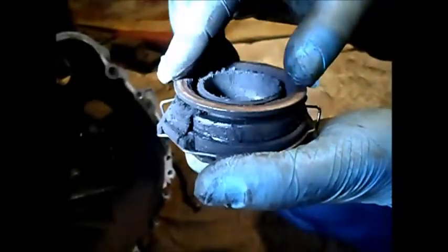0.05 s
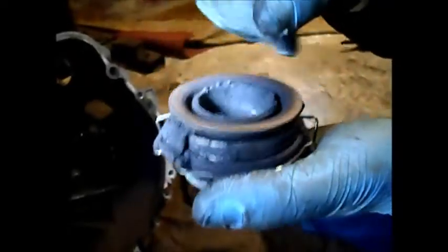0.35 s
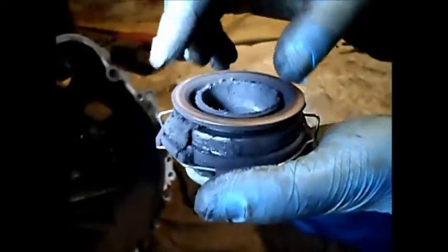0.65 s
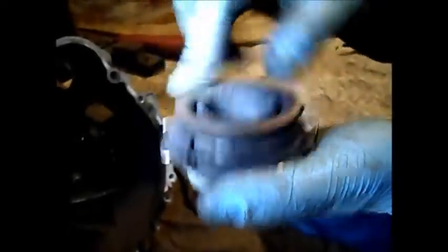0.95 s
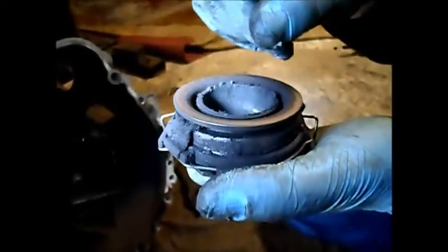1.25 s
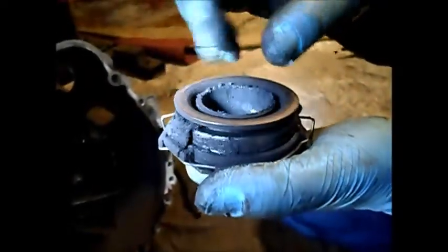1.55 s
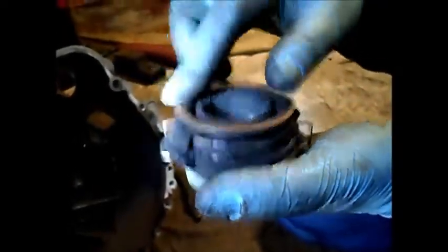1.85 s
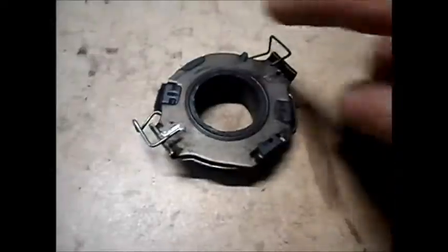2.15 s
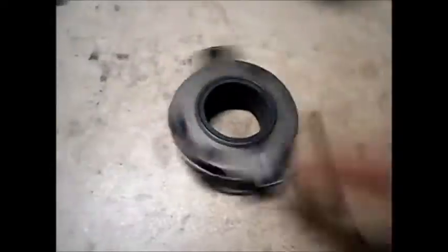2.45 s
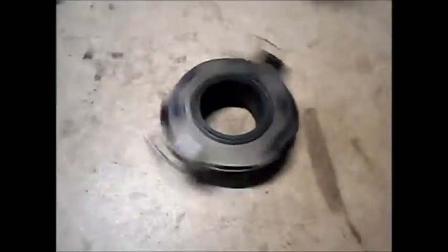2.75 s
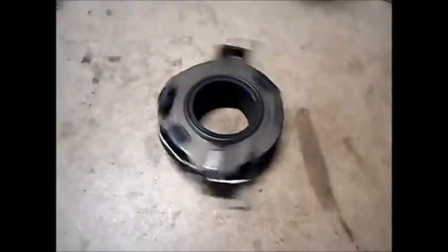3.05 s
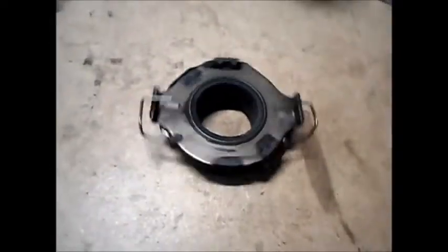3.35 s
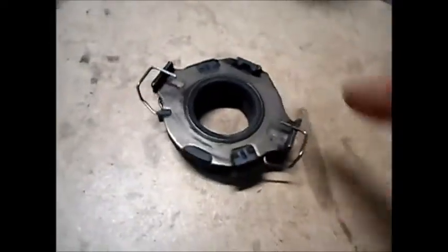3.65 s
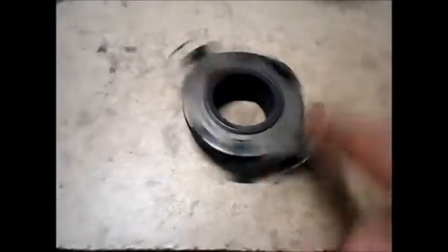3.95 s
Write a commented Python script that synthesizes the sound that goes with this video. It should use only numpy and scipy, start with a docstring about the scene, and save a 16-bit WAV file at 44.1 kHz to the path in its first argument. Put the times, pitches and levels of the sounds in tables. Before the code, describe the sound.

Worn bearing clatters in three metallic bursts before a second whirs down on a workbench.

```python
"""Workshop, close up. A dry, worn ball bearing is flicked round three times in a gloved hand:
its loose balls clatter in the steel races and make them ring. A second bearing is then spun on
the workbench: it rumbles through the top, slows and ends in single ticks.
Soft handling noise and low room rumble lie underneath."""
import sys
import numpy as np
from scipy import signal
from scipy.io import wavfile

SR = 44100
rng = np.random.default_rng(int(sys.argv[2]) if len(sys.argv) > 2 else 0)


def materialize(psi):
    """Save the field psi as 16-bit PCM at rate SR to the path in sys.argv[1].

    A 1-D psi becomes a single channel; in a 2-D psi each row is a channel.
    """
    bounded = np.clip(np.atleast_2d(psi).T, -1, 1)
    quanta = np.round(bounded * 32767).astype(np.int16)
    wavfile.write(sys.argv[1], SR, quanta)


N = 176400
TIME = np.arange(N) / SR

# Flicks: touch_s, full_speed_s, brake_s, stop_s, level_db, sag_db_per_s, brake_db
SPINS = [(-.1, -0.034, 0.18, 0.24, -24.5, 16.5, 12.5), (0.382, 0.426, 0.989, 1.066, -19, 18, 10.5),
         (1.181, 1.228, 1.915, 1.934, -19.5, 16.5, 1)]
# Hard knocks of loose balls: start_s, level_db
BALL_KNOCKS = [(.058, -5), (.111, -28), (.203, -13.5), (.389, -12.5), (.4145, -8), (.431, -15),
               (.439, -4.5), (.453, -4), (.479, -10.5), (.591, -24), (.637, -5), (.663, -20), (.681, -17),
               (.736, -6), (.753, -5), (.794, -6), (.822, -4), (.872, -8), (.894, -9), (.925, -13),
               (.979, -4), (1.022, -13.5), (1.06, -16.5), (1.2225, -8), (1.24, -12), (1.286, -7),
               (1.312, -28.5), (1.445, -22.5), (1.467, -37), (1.513, -4), (1.567, -5), (1.648, -9),
               (1.685, -4), (1.705, -10), (1.723, -6), (1.747, -10), (1.834, -11), (1.868, -30), (1.9, -11),
               (1.916, -13)]
# Finger scuffs on the rim: start_s, length_s, level_db
RIM_SCUFFS = [(.412, 0.03, -20.5), (1.221, 0.033, -22)]
# Spectrum of balls, cage and housing: freq_hz, gain_db
CLATTER_EQ = [(100, -30), (450, -26), (720, -21.5), (1050, -25), (1400, -15), (1650, -8), (2150, 0),
              (2400, -1), (2650, -7), (3200, -1), (3900, 1), (4900, 4), (5600, 1), (6400, -3), (7200, 3),
              (8200, -2.5), (8800, -9.5), (9600, -5.5), (10300, 0.5), (11000, -12.5)]
# Steel race modes: pitch_hz, width_hz, gain_db, grip_damping_db
RACE_MODES = [(4662, 150, -7.5, 3.5), (4873, 360, -6, 1.5), (7240, 720, -19.5, 1.5), (9380, 800, -7.5, 8),
              (9654, 560, .5, 8.5)]


def held_bearing():
    """Each flick drives ball impacts that clatter and ring the races until the fingers brake them."""
    release_s, grip_s = 0.011, 0.036
    effort, gripped = np.zeros(N), np.ones(N)
    for touch, full, brake, stop, level_db, sag_db_per_s, brake_db in SPINS:
        db = level_db + np.interp(TIME, [touch, full], [-16.5, 0])
        db -= sag_db_per_s * np.maximum(TIME - full, 0)
        db -= np.interp(TIME, [brake, stop], [0, brake_db])
        effort += amp(db) * (TIME >= touch) * (TIME < stop)
        gripped -= np.interp(TIME, [full - release_s, full, brake - grip_s, brake], [0, 1, 1, 0])
    balls = impacts(1300, spread_db=1.5, decay_s=0.00063, rise_s=0.0012)
    knocks = blows(BALL_KNOCKS, decay_s=0.0015)
    scuffs = swells(RIM_SCUFFS) * impacts(2300, spread_db=3, decay_s=0.00089)
    out = colour(amp(-3.5) * effort * balls + amp(1.5) * knocks + scuffs, CLATTER_EQ)
    ring_gain = amp(-1) * effort * (effort / effort.max()) ** 0.19  # harder spins ring more
    shared = 0.48  # share of strike power common to clatter and ring
    for hz, width_hz, db, damping_db in RACE_MODES:
        own_strikes = impacts(600, spread_db=5, decay_s=0.00034)
        strikes = np.sqrt(shared) * balls + np.sqrt(1 - shared) * own_strikes
        drive = ring_gain * strikes + amp(8) * knocks
        out += resonate(drive * amp(db - damping_db * gripped), hz, width_hz)
    return out


# Spin on the bench: time_s, speed_ratio
SPIN_SPEED = [(2.485, 0), (2.535, 0.46), (2.6, 0.91), (2.76, 0.93), (2.94, 0.75), (3.1, 0.58), (3.27, 0.48),
              (3.45, 0.26), (3.62, 0.14), (3.78, 0.026)]
# Bench top spectrum: freq_hz, gain_db
BENCH_EQ = [(40, -21), (95, 0), (120, -5), (148, 1.5), (194, -5), (247, 2), (300, -2), (377, -6), (435, 0),
            (481, -11.5), (528, -4.5), (560, -7), (608, -4), (735, -10.5), (843, -3), (950, -10),
            (1070, -17), (1330, -17.5), (1500, -27), (2200, -53)]
# Housing spectrum: freq_hz, gain_db
HOUSING_EQ = [(300, -27), (1000, -10), (1400, -5.5), (1570, -3.5), (1810, 4), (2150, -2.5), (2500, -0.5),
              (2800, 5.5), (3400, -2), (4600, -3), (5400, -9), (6500, -6.5), (7300, -14), (8800, -10.5),
              (9900, -8), (10500, -13.5), (11000, -31)]
# Dropping balls: start_s, level_db
BALL_TICKS = [(2.62, -16), (2.8608, -32), (2.8937, -22), (2.9192, -12), (2.945, -16), (2.9975, -31),
              (3.0404, -16), (3.078, -23), (3.1272, -40), (3.16, -22), (3.188, -28), (3.2205, -31),
              (3.2519, -20), (3.265, -26), (3.2953, -29), (3.322, -37), (3.3786, -27.5), (3.392, -28),
              (3.4555, -29), (3.5487, -39), (3.56, -35), (3.5996, -36.5), (3.641, -40)]


def bench_bearing():
    """Rolling balls shake the bench and rattle the housing, softer and duller as the spin dies."""
    speed = np.interp(TIME, *np.transpose(SPIN_SPEED), left=0, right=0)
    roll = unit(colour(impacts(1600, spread_db=4.5, decay_s=0.0012), BENCH_EQ))
    roll *= amp(-25.5) * speed ** 1.21
    whir = impacts(1300 * speed + 1, spread_db=1.5, decay_s=0.0014) * amp(-36) * speed ** 1.83
    ticks = amp(7) * blows(BALL_TICKS, decay_s=0.0018)
    rattle = colour(whir + ticks, HOUSING_EQ)
    return soften(roll, 485, speed ** 0.45) + soften(rattle, 5460, speed ** 0.79)


# After-rings: start_s, level_db
AFTER_RINGS = [(.24, -61), (1.07, -50)]
# Lingering steel modes: pitch_hz, gain_db, t60_s
AFTER_MODES = [(2380, -4, .5), (2875, 0, .55), (3840, -2, 1), (4366, -6.5, .6), (4613, -7, .5),
               (4727, -10, .4), (4974, -7.5, .4)]


def after_ring():
    """The steel sings on faintly once the balls stop."""
    out, t = np.zeros(N), TIME[:SR // 2]
    for start_s, level_db in AFTER_RINGS:
        for hz, db, t60_s in AFTER_MODES:
            add(out, start_s, amp(level_db + db - 60 * t / t60_s) * np.sin(2 * np.pi * hz * t))
    return out


# Hand movements: start_s, length_s, level_db
HAND_THUDS = [(.06, .2, -43.5), (.39, .24, -41.5), (.73, 0.32, -42), (1.04, 0.27, -42), (1.82, .13, -42),
              (1.95, 0.16, -47)]
# Thud spectrum: freq_hz, gain_db
THUD_EQ = [(25, -19), (50, 6), (85, 0.5), (160, -1.5), (220, -20), (400, -23.5), (1000, -49.5)]
# Glove strokes: start_s, length_s, level_db
GLOVE_BRUSHES = [(.225, 0.11, -53.5), (.3, 0.19, -45.5), (1.06, 0.27, -51)]
# Glove spectrum: freq_hz, gain_db
GLOVE_EQ = [(300, -16), (1200, -14.5), (2000, -11.5), (2700, 0), (3300, -4), (3900, 3.5), (4600, 3.5),
            (5400, -3.5), (7000, -9), (10500, -16)]
# Taps on the second bearing: start_s, level_db
FINGER_TAPS = [(2.003, -27), (2.496, -19.5)]
# Tap spectrum: freq_hz, gain_db
TAP_EQ = [(300, -19), (1400, -15), (1900, -6), (2300, 4), (2550, -7), (2900, 4.5), (3400, -5), (5000, -6),
          (8500, -22), (10500, -21)]


def hands():
    """Moving hands thud softly, gloves brush the rim, fingers tap the steel."""
    thuds = swells(HAND_THUDS) * unit(colour(rng.standard_normal(N), THUD_EQ))
    brushes = swells(GLOVE_BRUSHES) * colour(impacts(1100, spread_db=0.5, decay_s=0.002), GLOVE_EQ)
    taps = colour(blows(FINGER_TAPS, decay_s=0.00048), TAP_EQ)
    return thuds + brushes + taps


def bench_bump(start_s=1.935, level_db=-44, t60_s=0.37):
    """A dull knock dies away in the bench top."""
    out, t = np.zeros(N), TIME[:SR // 2]
    add(out, start_s, amp(level_db - 60 * t / t60_s) * colour(rng.standard_normal(len(t)), BENCH_EQ))
    return out


# Room noise, bearing in hand: freq_hz, gain_db
ROOM_HELD_EQ = [(20, -2.5), (50, -4), (120, -14), (250, -22.5), (450, -26.5), (720, -24.5), (1100, -30),
                (3000, -32), (10000, -38.5)]
# Room noise at the bench: freq_hz, gain_db
ROOM_BENCH_EQ = [(20, -3), (65, -9), (115, -25), (160, -24.5), (200, -33.5), (300, -33.5), (520, -39),
                 (2200, -47.5), (10200, -53), (10900, -70)]


def background(switch_s=1.934):
    """Low room rumble and faint hiss; more rumble at the bench."""
    held = amp(-49) * unit(colour(rng.standard_normal(N), ROOM_HELD_EQ))
    bench = amp(-42.5) * unit(colour(rng.standard_normal(N), ROOM_BENCH_EQ))
    return np.where(TIME < switch_s, held, bench)


def room(x, wet_db, t60_s):
    """Adds short workshop reflections."""
    t = TIME[:SR // 3]
    tail = rng.standard_normal(len(t)) * amp(-60 * t / t60_s) * (t > 0.003)
    return x + amp(wet_db) * signal.fftconvolve(x, tail / np.linalg.norm(tail))[:N]


def contact_envelope(decay_s, rise_s):
    """Fast rise and exponential decay of one contact."""
    t = TIME[:SR // 40]
    return np.exp(-t / decay_s) * (1 - np.exp(-(t / rise_s) ** 2))


def impacts(rate_per_s, spread_db, decay_s, rise_s=0.0005):
    """Random contacts of uneven strength, each a noise burst; rms 1."""
    onsets = rng.random(N) < rate_per_s / SR
    hits = onsets * amp(spread_db * np.clip(rng.standard_normal(N), -2, 2))
    power = signal.oaconvolve(hits ** 2, contact_envelope(decay_s, rise_s) ** 2)[:N]
    return unit(np.sqrt(np.maximum(power, 0)) * rng.standard_normal(N))


def blows(rows, decay_s):
    """Timed contacts, each a burst of micro-bounces."""
    out, envelope = np.zeros(N), contact_envelope(decay_s, rise_s=0.0001)
    for start_s, db in rows:
        burst = rng.standard_normal(len(envelope)) * envelope
        add(out, start_s, amp(db) * burst / np.linalg.norm(burst))
    return out


def swells(rows):
    """One rounded rise and fall per row."""
    out = np.zeros(N)
    for start_s, length_s, db in rows:
        arch = np.sin(np.linspace(0, np.pi, int(length_s * SR)))
        add(out, start_s, amp(db) * np.sqrt(abs(arch)))
    return out


def colour(x, eq):
    """Minimum-phase filter of unit energy through the eq points."""
    hz, db = np.transpose(eq)
    size = 8192
    bins_hz = abs(np.fft.fftfreq(size, 1 / SR)) + 1
    log_gain = np.log(amp(np.interp(np.log(bins_hz), np.log(hz), db)))
    spectrum = np.exp(np.conj(signal.hilbert(log_gain)))
    ring = np.fft.ifft(spectrum).real[:size // 2]
    return signal.fftconvolve(x, ring / np.linalg.norm(ring))[:len(x)]


def resonate(x, hz, width_hz):
    """Steep resonance of unit energy."""
    t = TIME[:SR // 20]
    ring = t * np.exp(-np.pi * width_hz * t) * np.sin(2 * np.pi * hz * t)
    return signal.fftconvolve(x, ring / np.linalg.norm(ring))[:len(x)]


def soften(x, corner_hz, treble_gain):
    """Scales the band above the corner."""
    low = signal.filtfilt(*signal.butter(2, corner_hz, fs=SR), x)
    return low + (x - low) * treble_gain


def amp(db):
    """Decibels to gain."""
    return 10 ** (np.asarray(db) / 20)


def unit(x):
    """Scales to rms 1."""
    return x / np.sqrt(np.mean(x ** 2) + 1e-20)


def add(mix, start_s, sound):
    """Mixes a sound in at start_s."""
    part = mix[max(round(start_s * SR), 0):][:len(sound)]
    part += sound[:len(part)]


def scene():
    """Both bearings in turn over handling and room noise; mono."""
    held = room(held_bearing(), wet_db=-13.5, t60_s=0.056)
    bench = room(bench_bearing(), wet_db=-10.5, t60_s=0.22)
    return (held + bench + after_ring() + hands() + bench_bump() + background())[None]


def record(dry):
    """Steep low-pass on the mix."""
    cutoff_hz = 10850
    lowpass = signal.firwin(141, cutoff_hz, window=("kaiser", 8), fs=SR)
    return signal.oaconvolve(dry, lowpass[None], "same")


dry = scene()
out = record(dry)
materialize(out)
```